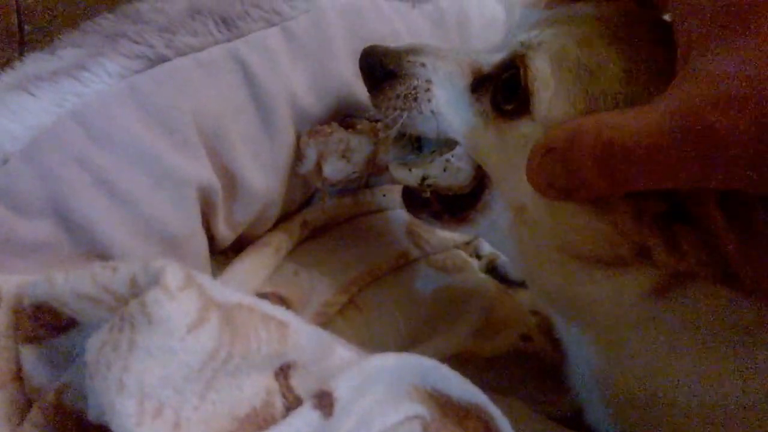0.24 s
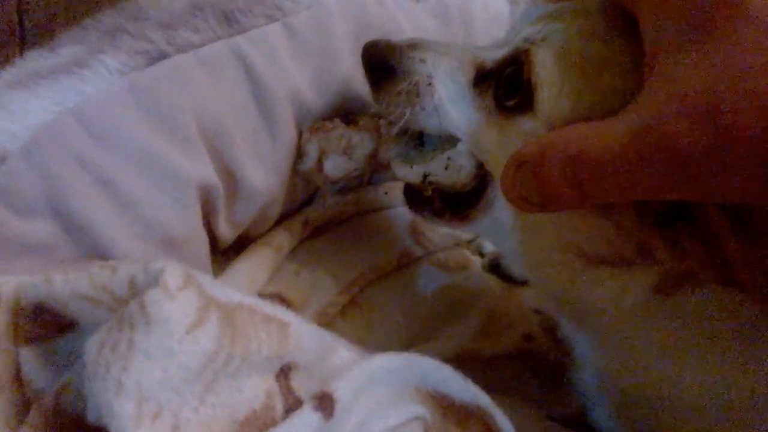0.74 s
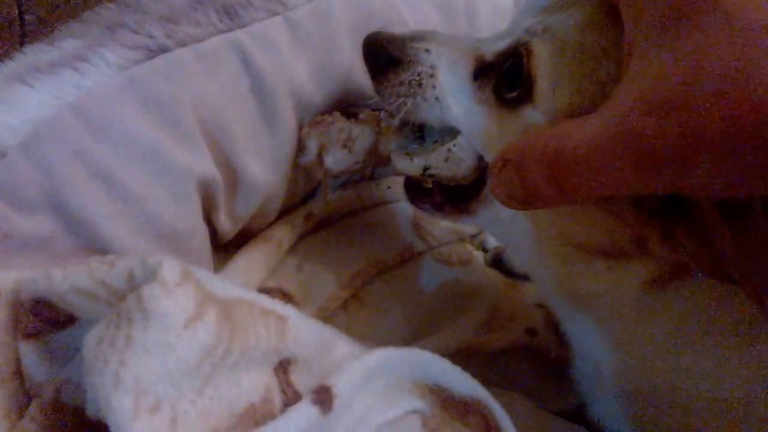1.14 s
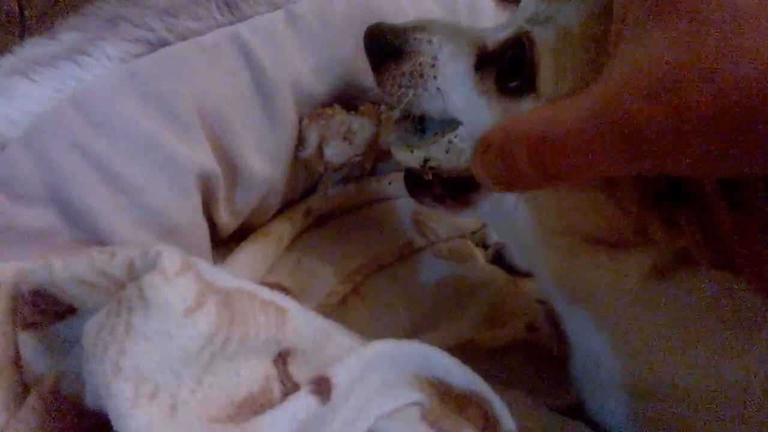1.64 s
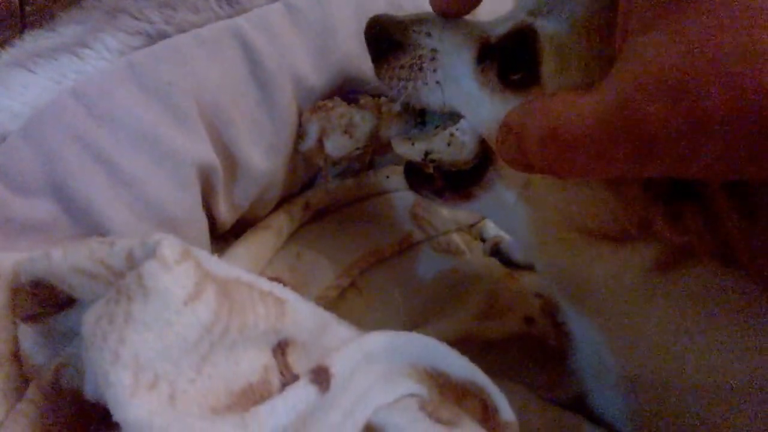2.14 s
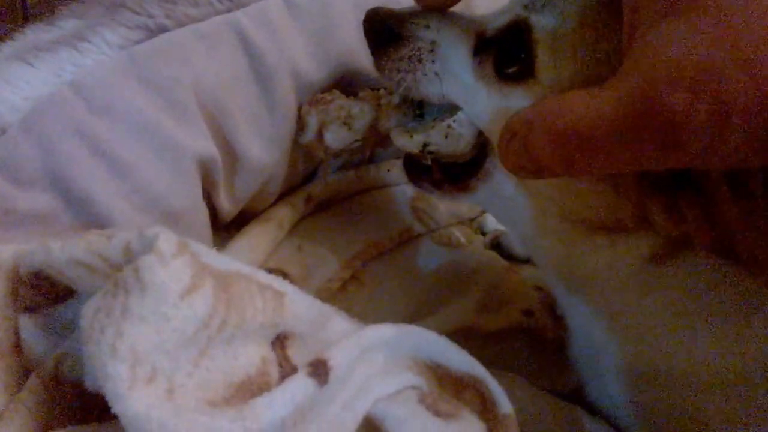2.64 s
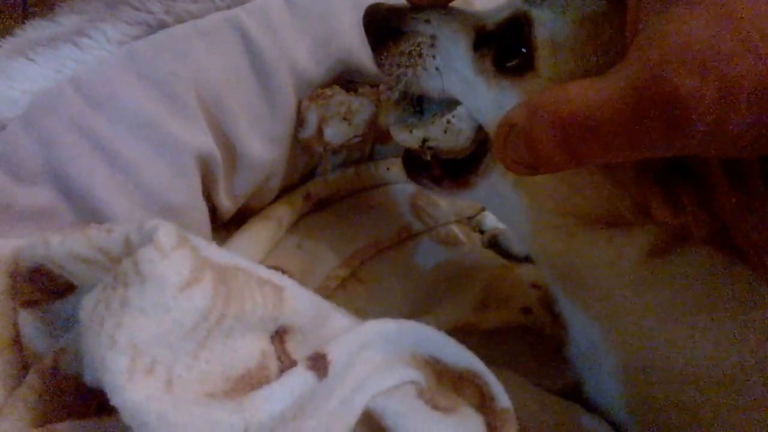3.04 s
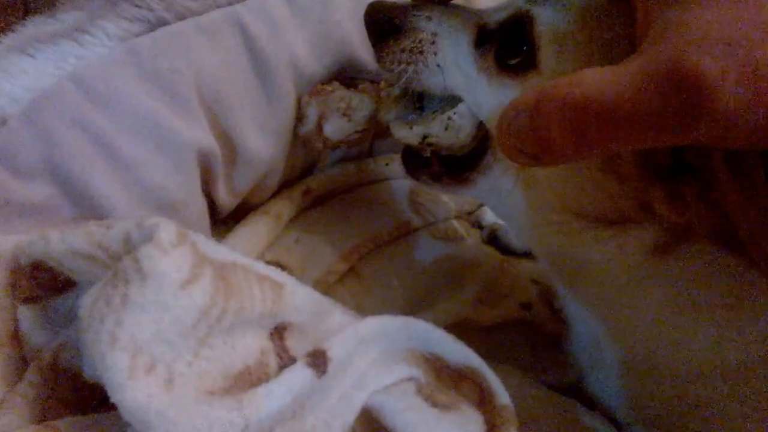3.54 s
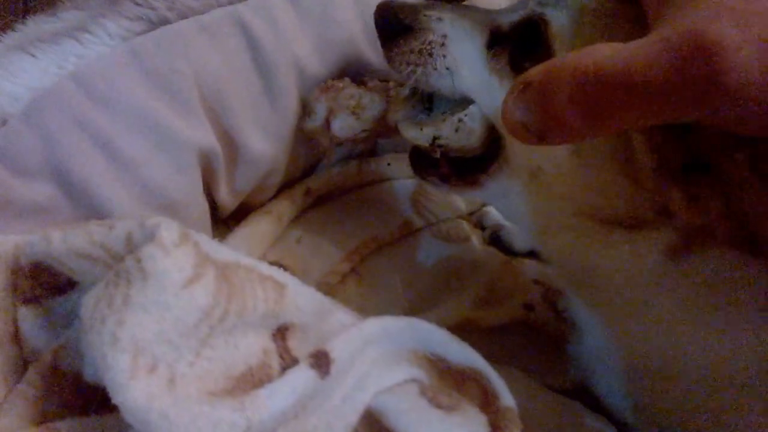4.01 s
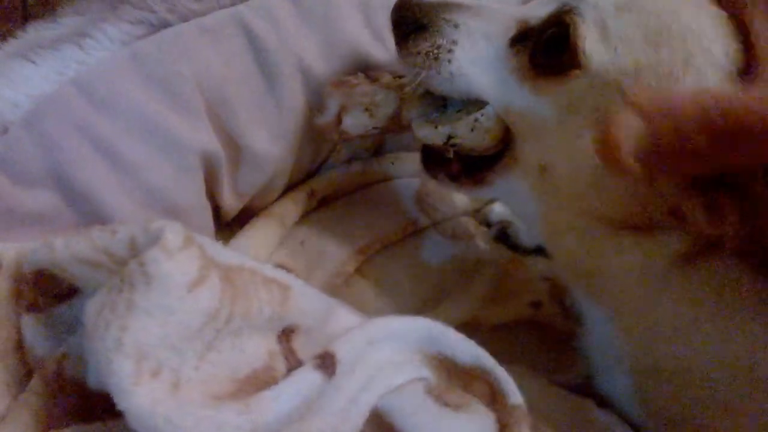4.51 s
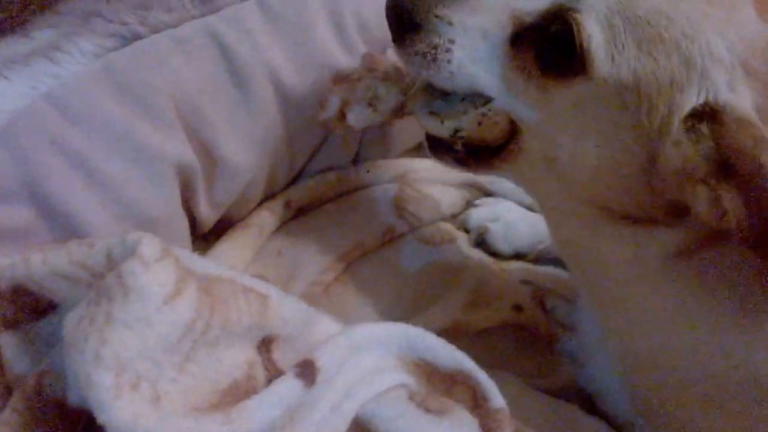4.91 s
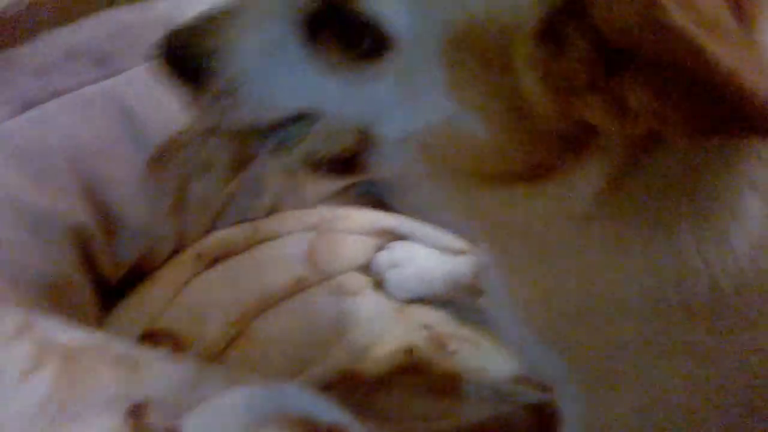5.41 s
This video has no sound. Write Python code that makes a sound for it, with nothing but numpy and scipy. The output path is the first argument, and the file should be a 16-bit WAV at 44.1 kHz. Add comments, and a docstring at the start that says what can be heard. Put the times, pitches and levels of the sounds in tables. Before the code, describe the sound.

A small dog guarding a bone growls six times, close to the microphone in a quiet room. The growls are low, throbbing and buzzy, with air rasping through its teeth and quick snorts between them. The fourth rises into a short yelp. The last two are shorter, ending in a creak and a huff, and the dog's fur slides faintly on a blanket.

```python
"""A small dog guards its bone

Close by in a quiet room, a dog on a blanket growls six times, the last trailing off in a creak.
Its vocal folds make a low, throbbing buzz while air rasps through its teeth. One growl breaks into
a short yelp as a hand touches the dog. It snorts between growls, and at the end it shifts,
its fur sliding on the blanket."""
import sys
import numpy as np
from scipy import signal
from scipy.fft import rfft, irfft, next_fast_len
from scipy.io import wavfile
from scipy.ndimage import uniform_filter1d

SR = 44100
rng = np.random.default_rng(int(sys.argv[2]) if len(sys.argv) > 2 else 0)


def store_pcm(level_fs):
    """Save levels as 16-bit WAV."""
    pcm = np.round(np.clip(level_fs, -1, 1) * 32767).astype(np.int16)
    wavfile.write(sys.argv[1], SR, np.atleast_2d(pcm).T)


N = 249606
TIME = np.arange(N) / SR


def from_db(db):
    """Turn decibels into a number to multiply by."""
    return 10 ** (np.asarray(db) / 20)


def rms_one(x):
    """Scale a signal to an average strength (rms) of 1."""
    return x / np.sqrt(np.mean(x ** 2) + 1e-20)


def wander(per_s):
    """A random wobble that heads for a new value per_s times a second."""
    steps = rng.standard_normal(N // 16)
    return rms_one(np.interp(TIME * per_s, np.arange(len(steps)), steps))


def swell(peak_s, rise_s, fall_s):
    """A bell-shaped rise and fall of height 1."""
    lag = TIME - peak_s
    return np.exp(-np.minimum((lag / np.where(lag < 0, rise_s, fall_s)) ** 2, 30))


def colour(x, spectrum):
    """Make each frequency louder or softer, following a table of f/Hz, level/dB."""
    size = next_fast_len(N + SR // 4, True) // 2 * 2
    hz, db = np.transpose(spectrum)
    octave = np.log2(np.arange(size // 2 + 1) * SR / size + 1)
    outside = np.abs(octave - np.clip(octave, np.log2(hz[0]), np.log2(hz[-1])))
    gain = from_db(np.interp(octave, np.log2(hz), db) - 20 * np.minimum(outside, 2))
    # make the filter ring only after a sound, never before it
    cepstrum = irfft(np.log(gain))
    cepstrum[1:size // 2] *= 2
    cepstrum[size // 2 + 1:] = 0
    return irfft(rfft(x, size) * np.exp(rfft(cepstrum)))[:N]


def steady(x, low_hz, high_hz):
    """Even out slow changes of loudness, going by one band of frequencies."""
    band = signal.sosfilt(signal.butter(2, [low_hz, high_hz], "band", fs=SR, output="sos"), x)
    power = uniform_filter1d(uniform_filter1d(band ** 2, size=2000), size=1400)
    return x / np.sqrt(power + 1e-12)


def noise(spectrum):
    """Noise of strength 1 with the given tone."""
    return rms_one(colour(rng.standard_normal(N), spectrum))


def resonate(x, hz, width_hz):
    """Keep mostly the sound near one frequency."""
    b, a = signal.iirpeak(hz, hz / width_hz, fs=SR)
    return signal.lfilter(b, a, signal.lfilter(b, a, x))


def echoes(x, fade_s, spectrum):
    """A crowd of echoes that fades by 60 dB in fade_s."""
    fade = from_db(-60 * np.minimum(TIME / fade_s, 2))
    tail = (rng.standard_normal(N) * fade * (TIME > .0015))[:SR]
    return colour(signal.fftconvolve(x, tail / np.linalg.norm(tail))[:N], spectrum)


# tone of the quiet room: f/Hz, level/dB
BACKGROUND_TONE = [(15, -54), (25, -13), (139, -1.5), (637, -20), (769, -18), (1420, -22.5), (1860, -32.5),
                   (2560, -32), (3010, -32), (15000, -46.5)]

def background(level_db=-64):
    """A faint, steady rumble."""
    return from_db(level_db) * noise(BACKGROUND_TONE)


# echoes from nearby surfaces and from the walls: f/Hz, level/dB
NEAR_ECHO = [(150, -26.5), (500, -12), (1100, -9), (2500, -10), (5000, -7), (12000, -19)]
WALL_ECHO = [(100, -9), (300, -10.5), (600, -9), (1000, -12.5), (2500, -23.5), (3500, -22.5), (7000, -29),
             (14000, -37)]
# notes at which the room rings (standing waves): f/Hz, width/Hz, level/dB
ROOM_NOTES = [(151.3, 3.3, -8), (195.7, 5, -10)]

def room(x):
    """Sound bounces around the room, and two low notes hum on after each growl."""
    hum = sum(from_db(db) * signal.lfilter(*signal.iirpeak(hz, hz / width, fs=SR), x)
              for hz, width, db in ROOM_NOTES)
    return x + echoes(x, fade_s=.048, spectrum=NEAR_ECHO) + echoes(x, fade_s=.48, spectrum=WALL_ECHO) + hum


# tone of fur rubbing on cloth: f/Hz, level/dB
CLOTH_TONE = [(240, -35), (400, -7), (473, -10), (1000, -16), (1260, -5), (1360, -14), (1470, -2),
              (1990, -7.5), (6780, -8.5), (12100, -16), (15500, -36)]
# the dog's movements: start/s, end/s, level/dB
SLIDES = [(5.243, 5.345, -51), (5.348, 5.55, -71.5), (5.558, 5.7, -51.5)]

def blanket(attack_s=.01, release_s=.0079, grain_db=1.5):
    """Fibres catch and slip under the moving dog."""
    slide = sum(from_db(db) * np.clip((TIME - start) / attack_s, 0, 1)
                * np.exp(-np.clip((TIME - end) / release_s, 0, 20)) for start, end, db in SLIDES)
    return noise(CLOTH_TONE) * slide * from_db(grain_db * wander(400))


# breaths through the nose: four snorts in, then one faint breath out
# peak t/s, whistle level/dB, hiss level/dB
BREATHS = [(.64, -46, -51.5), (1.966, -41, -43.5), (3.257, -51.5, -54.5), (4.311, -50.5, -66),
           (4.83, -56.5, -72)]
# slaps of the soft palate, at the back of the mouth's roof: t/s, relative level/dB
SLAPS = [(0.624, -22.5), (0.64, -20.5), (0.656, -22), (1.954, -19.5), (1.959, -27.5), (1.976, -18.5),
         (1.992, -24), (3.245, -28), (3.261, -27), (3.275, -25.5)]
# tones of the whistle, the hiss and the slaps: f/Hz, level/dB
WHISTLE_TONE = [(150, 2), (450, -8), (800, -7), (1250, 2.5), (1800, -16.5), (2500, -7), (3100, -1),
                (3800, -5), (4700, -15.5), (8000, -35)]
HISS_TONE = [(700, 1), (1250, 1), (1900, -10), (4000, 2), (5500, -1), (7500, -8), (9000, -4), (12000, -12),
             (15000, -33)]
SLAP_TONE = [(35, -9), (75, 4), (160, 10.5), (350, 0), (570, 1.5), (780, -6.5), (1000, -0.5), (1300, -3.5),
             (1700, -23.5), (3000, -22), (6000, -29), (13000, -48)]

def nose_breaths(slap_db=6.5, slap_decay_s=.0043, slap_push=.18):
    """Air whistles through the nose; the first three snorts flap the palate with a wet spatter."""
    whistle = noise(WHISTLE_TONE)
    whistle *= sum(from_db(db) * swell(s, rise_s=.046, fall_s=.045) for s, db, _ in BREATHS)
    hiss = noise(HISS_TONE) * from_db(2.6 * wander(150))
    hiss *= sum(from_db(db) * swell(s, rise_s=.023, fall_s=.037) for s, _, db in BREATHS)
    slaps = sum(from_db(db) * (TIME >= s) * np.exp(-np.minimum(np.abs(TIME - s) / slap_decay_s, 20))
                for s, db in SLAPS)
    spatter = slaps * (rng.standard_normal(N) - slap_push)
    return whistle + hiss + from_db(slap_db) * colour(spatter, SLAP_TONE)


# six growls and the final creak: start/s, end/s, release/s, pitch/Hz, chest change/dB, buzz change/dB,
# teeth change/dB, lip lift/0-1, wait for the first throb/s, throb rate/Hz
GROWL_PLAN = [ (-.06, .575, .04, 147.4, 0, -0.54, 0, 0, .047, 20.8),
              (.869, 1.896, .03, 143.5, -0.5, 0, 0.23, .05, .038, 20.8),
              (2.146, 3.19, .065, 146.1, -0.7, 0.46, -0.17, .95, .041, 20.4),
              (3.456, 4.262, .065, 144.9, -0.3, .5, 0, 0.99, .037, 20.5),
              (4.477, 4.812, .055, 141.1, -0.5, -0.5, -0.4, 0.32, .022, 19.8),
              (5.124, 5.235, .03, 139, -1.5, -1, -21, 0.29, .028, 21.3),
              (5.226, 5.334, 0.053, 112.2, -15, -6.5, -17, .3, .024, 21), ]
# surges of anger tighten the vocal folds: peak t/s, rise/s, fall/s, added pitch/Hz
ANGER = [(.41, 0.086, 0.079, 14.3), (1.51, 0.061, .2, 22.5), (1.857, 0.045, 0.034, 89),
         (3.09, .13, 0.082, 14), (3.94, .05, .03, 7), (4.037, .048, .096, 240), (4.69, 0.074, 0.048, 17.4)]

def gestures(scoop=.14, scoop_s=.045, sag=.3, top_hz=362.8, throb_drag=.75):
    """What the dog does at each moment: each growl slides up to its pitch and sags as it dies."""
    rows = np.array(GROWL_PLAN)
    current = np.maximum(np.searchsorted(rows[:, 0], TIME) - 1, 0)
    start, end, release, base_hz, chest_db, buzz_db, teeth_db, lip, wait, throb_hz = rows[current].T
    age = np.maximum(TIME - start, 0)
    dying = np.clip(1 - (end - TIME) / release, 0, 1)
    surge = sum(hz * swell(s, rise, fall) for s, rise, fall, hz in ANGER)
    pitch = (base_hz + surge) * (1 - scoop * np.exp(-age / scoop_s)) * (1 - sag * dying)
    # tighter folds throb more slowly
    delay = throb_drag * np.cumsum(surge / (base_hz + surge)) / SR
    throbs = (age - wait - delay + np.interp(start, TIME, delay)) * throb_hz
    return age, dying, np.minimum(pitch, top_hz), chest_db, buzz_db, teeth_db, lip, throbs


def vocal_folds(pitch, strain, clear):
    """The folds click shut once a cycle, then bounce more weakly. Gives cycle count and clicks."""
    jitter = (.011 + .045 * strain * (1 - clear)) * (1 - .67 * clear)
    cycles = np.cumsum(pitch * (1 + jitter * wander(260))) / SR
    closures = np.diff(np.floor(cycles), prepend=0)
    bounces = np.diff(np.floor(np.maximum(cycles - .46 + .039 * wander(90), 0)), prepend=0)
    flicker_db = 1.36 * (1 - .6 * clear) * wander(300)
    return cycles, rms_one((closures + .5 * (1 - clear) * bounces) * from_db(flicker_db))


def puffs(cycles, sharpness=1.95, leak=.5):
    """Rushing air: one burst a cycle on top of a steady leak."""
    burst = np.exp(sharpness * (np.cos(2 * np.pi * cycles) - 1))
    return rms_one((leak + burst) * rng.standard_normal(N))


def chest_hum(cycles, strain, dip, skew=.086, undertone=.23, waver_db=1.0, dip_db=7.8):
    """Air flows in a lopsided wave; under strain every other cycle differs, adding a lower note."""
    flow = np.sin(2 * np.pi * cycles) - skew * np.sin(4 * np.pi * cycles)
    flow += undertone * strain * wander(70) * np.sin(np.pi * cycles)
    return np.sqrt(2) * flow * from_db(waver_db * wander(14) - dip_db * dip)


# how the throat rings: f/Hz, level/dB
THROAT_TONE = [(170, -18), (255, 5.5), (330, -3.5), (390, -4), (465, -1), (540, -11), (640, -5),
               (790, -14.5), (915, 3.5), (1070, 2.5), (1280, -0.5), (1400, -21.5), (1560, -13.5),
               (1900, -37)]

def throat_buzz(clicks, air, dip, strain, clear, push, bass_loss=.88, bass_hz=600):
    """Clicks ring in the throat, hoarser in each dip and under strain, clearer in the yelp."""
    hoarse = (.21 + .49 * np.maximum(dip, 0) + .98 * strain) * (1 - .5 * clear)
    buzz = steady(colour(clicks + hoarse * air, THROAT_TONE), 800, 1400)
    bass = signal.lfilter(*signal.butter(1, bass_hz, fs=SR), buzz)
    buzz -= bass_loss * push * bass   # pressed folds sound brighter
    return buzz * (1 - .24 * clear)   # the open mouth takes over from the throat


def mouth_snarl(clicks, air, lip, ring_hz=2370, lifted_hz=2570, width_hz=420):
    """The mouth rings, higher when the lip is lifted."""
    source = clicks + 1.54 * air
    lowered = resonate(source, ring_hz, width_hz)
    lifted = resonate(source, lifted_hz, width_hz)
    return steady((1 - lip) * lowered + lip * lifted, 2100, 3000)


# tone of air passing the teeth, with the lip down and up: f/Hz, level/dB
LIP_DOWN = [(2600, -21), (3200, -12.5), (3450, 7.5), (3700, 5.5), (4150, -5.5), (4950, 8.5), (5600, -4.5),
            (6200, 2.5), (6750, -7.5), (7250, -3.5), (7700, -9.5), (9200, -13.5), (10600, -3.5),
            (12400, -13.5), (13800, -27), (15000, -46)]
LIP_UP = [(2900, -6), (3280, -16), (3680, 10.5), (4150, -7.5), (4950, 1), (5700, -1), (6550, 5), (7200, 2),
          (7700, -8), (9100, -13), (10600, -3), (11300, -9.5), (12200, -5.5), (13800, -29), (15000, -38)]

def teeth_rasp(clicks, air, lip):
    """Each puff of air scrapes past the teeth."""
    jet = .19 * clicks + air * from_db(2 * wander(140))
    return steady((1 - lip) * colour(jet, LIP_DOWN) + lip * colour(jet, LIP_UP), 4500, 12000)


# short breaths out: peak t/s, rise/s, fall/s, snarl level/dB, rasp level/dB
OUT_BREATHS = [(4.782, 0.032, 0.021, -52.5, -46.5), (4.93, 0.024, 0.069, -69.5, -95),
               (5.276, 0.056, 0.033, -52, -50)]

def huffs(snarl, rasp):
    """The last of the air huffs out past the teeth."""
    return sum(swell(s, rise, fall) * (snarl * from_db(snarl_db) + rasp * from_db(rasp_db))
               for s, rise, fall, snarl_db, rasp_db in OUT_BREATHS)


# how the open mouth rings: f/Hz, level/dB
YELP_TONE = [(250, -25.5), (370, -6), (730, 3), (1080, 2.5), (1450, -8.5), (1820, -15), (2200, -4),
             (2550, -5), (2900, -8), (3300, -31), (6000, -34.5)]

def yelp(clicks, air, mouth, level_db=-22.5):
    """The voice rings out while the mouth is open."""
    return steady(colour(clicks + .45 * air, YELP_TONE), 300, 3000) * mouth * from_db(level_db)


def growls(easy_hz=143, yelp_s=4.05, flutter=.15, throb_spread=.16, waver=.011):
    """Throbbing vocal folds drive the chest, throat, mouth and teeth together."""
    age, dying, pitch, chest_db, buzz_db, teeth_db, lip, throbs = gestures()
    effort = np.maximum(np.log2(pitch / easy_hz), 0)   # octaves above the easy pitch
    push = np.tanh(effort / .27)   # the lungs soon reach their limit
    strain = np.clip((pitch - 168) / 30, 0, 1)
    mouth = swell(yelp_s, rise_s=.026, fall_s=.031)
    clear = np.sqrt(mouth)
    # slack folds throb deeply, tight ones hardly at all; no two dips are equally deep
    slack = np.clip((178 - pitch) / 33, 0, 1.15)
    dip = slack * (np.abs(np.sin(np.pi * throbs)) ** 3.5 * (1 + throb_spread * wander(20)) - .33)
    cycles, clicks = vocal_folds(pitch * (1 - flutter * dip + waver * wander(12)), strain, clear)
    air = puffs(cycles)

    chest = chest_hum(cycles, strain, dip)
    buzz = throat_buzz(clicks, air, dip, strain, clear, push)
    snarl = mouth_snarl(clicks, air, lip)
    rasp = teeth_rasp(clicks, air, lip)
    chest_level = -23.9 + chest_db + 1.5 * push - 5 * strain
    buzz_level = -38.5 + buzz_db + 7.8 * push - .8 * dip
    snarl_level = -51 + teeth_db + 4 * lip + 8 * effort - .8 * dip
    rasp_level = -48.7 + teeth_db + 6.5 * effort - 2.5 * dip

    def shape(db, attack_s, curve, fade=.99):
        """One part of the voice rises, holds and fades."""
        return (1 - np.exp(-(age / attack_s) ** curve)) * (1 - dying) ** fade * from_db(db)

    return (chest * shape(chest_level, attack_s=.055, curve=1.5, fade=1.23)
            + buzz * shape(buzz_level, attack_s=.034, curve=1.335)
            + snarl * shape(snarl_level, attack_s=.036, curve=1.335)
            + rasp * shape(rasp_level, attack_s=.076, curve=2.15)
            + huffs(snarl, rasp) + yelp(clicks, air, mouth))


def scene():
    """Dog and blanket in the room, over its faint background, in one channel."""
    return (room(growls() + nose_breaths() + blanket()) + background())[None]


def record(dry, cutoff_hz=15750):
    """Cut off the very highest treble steeply."""
    return signal.sosfilt(signal.ellip(10, .1, 80, cutoff_hz, fs=SR, output="sos"), dry)


dry = scene()
out = record(dry)
store_pcm(out)
```